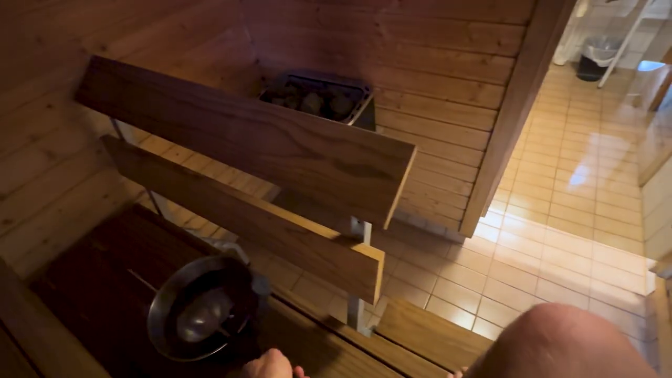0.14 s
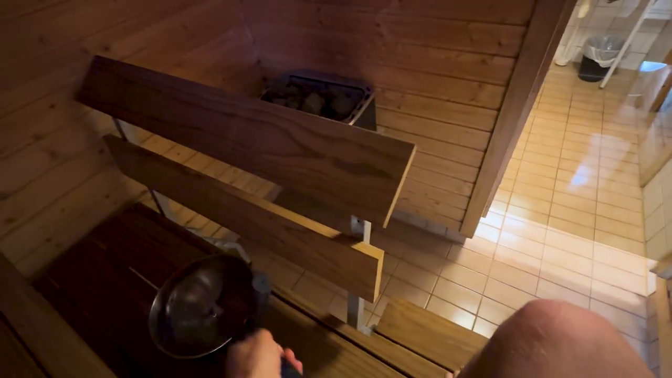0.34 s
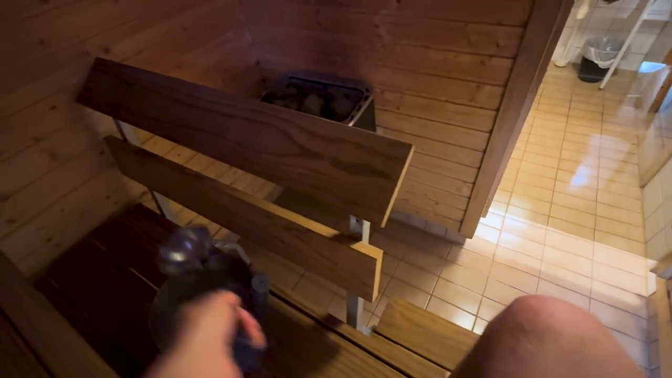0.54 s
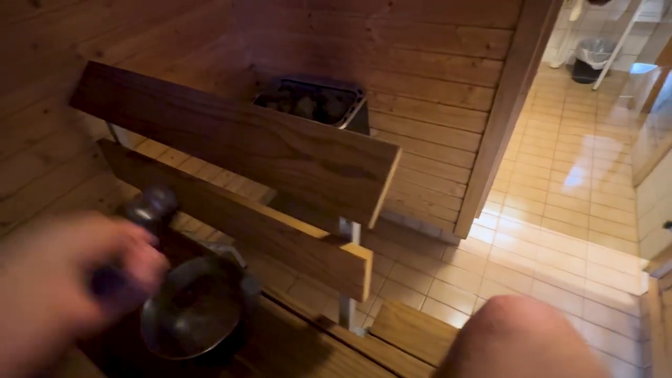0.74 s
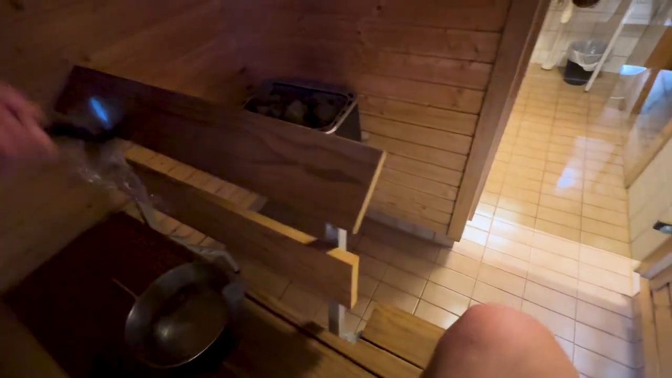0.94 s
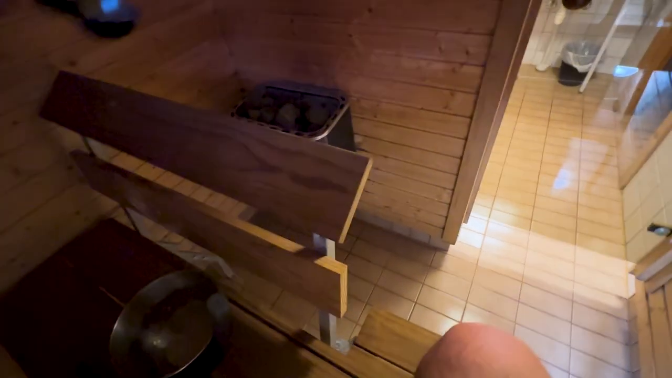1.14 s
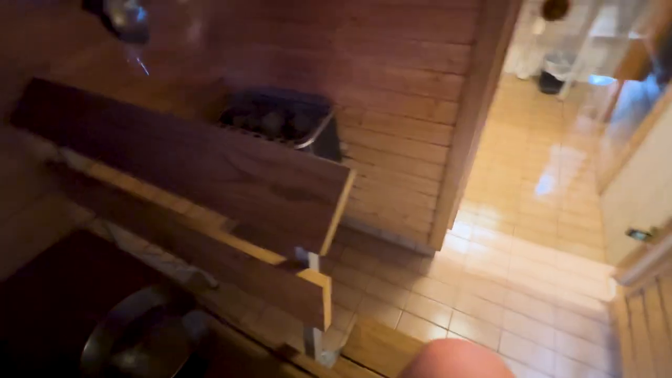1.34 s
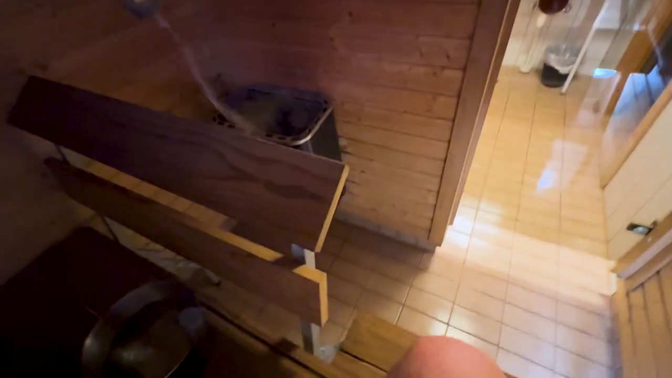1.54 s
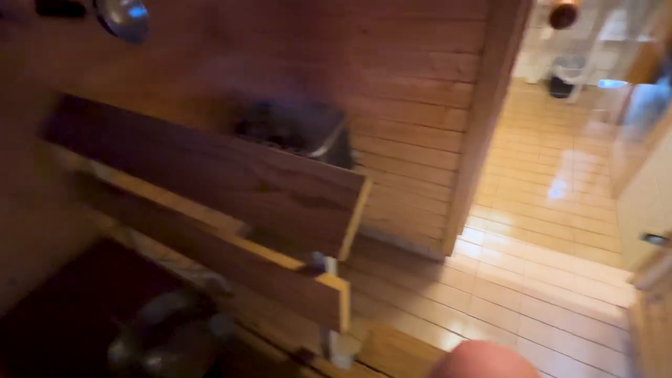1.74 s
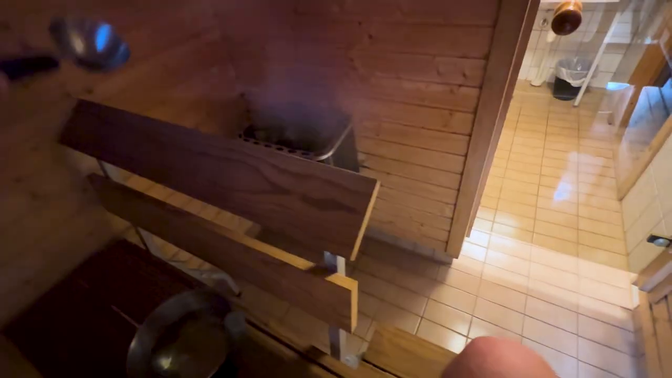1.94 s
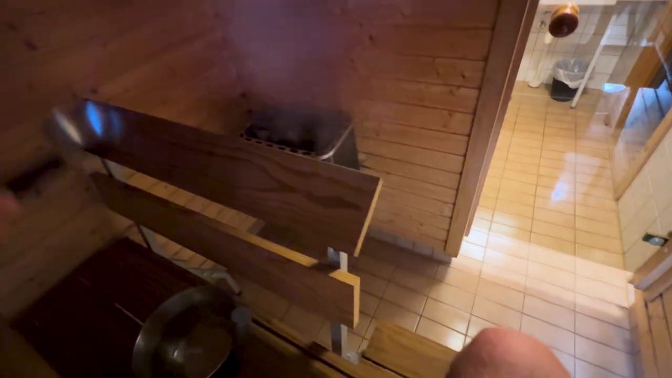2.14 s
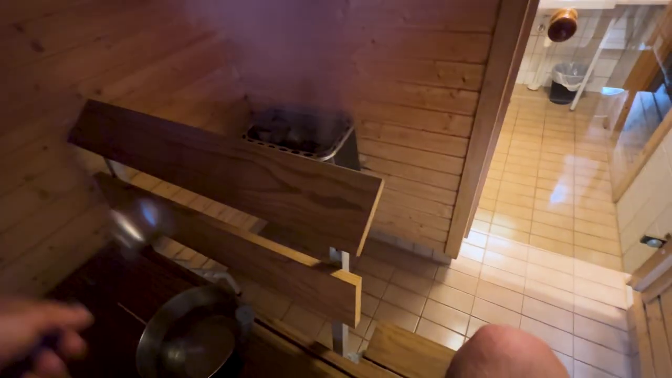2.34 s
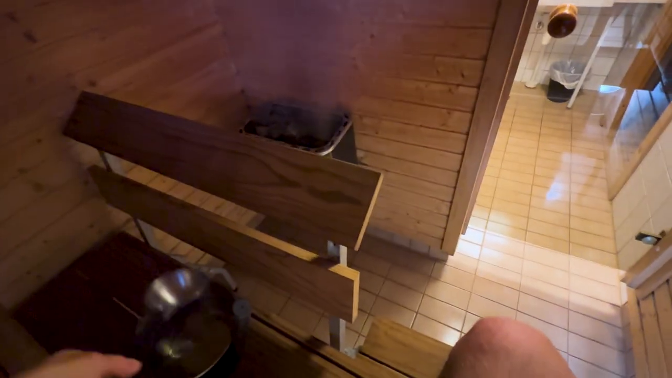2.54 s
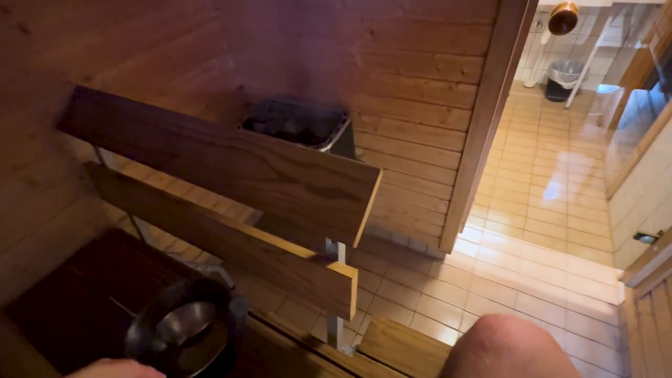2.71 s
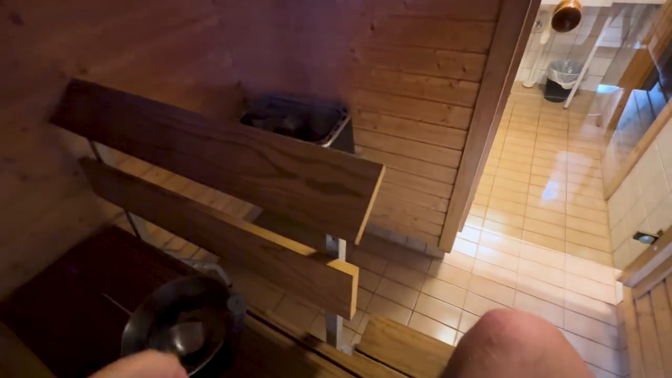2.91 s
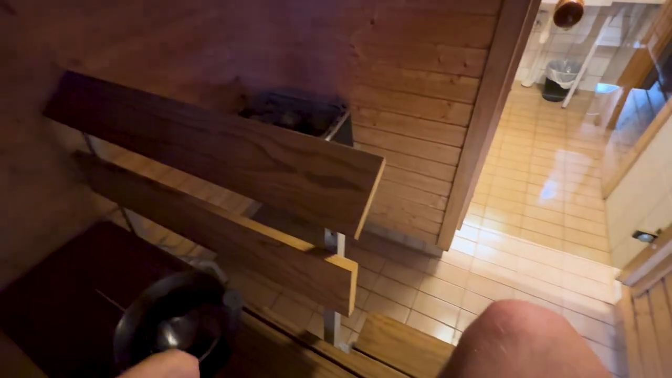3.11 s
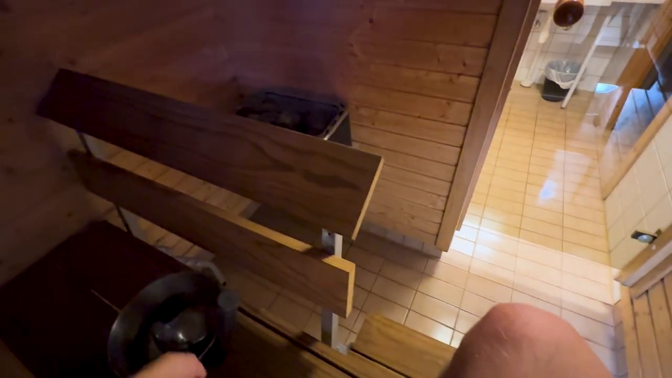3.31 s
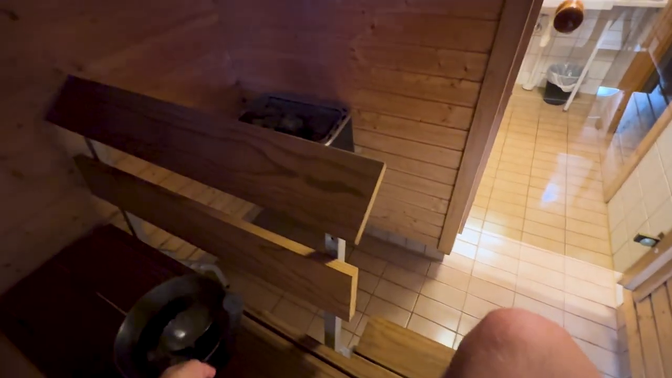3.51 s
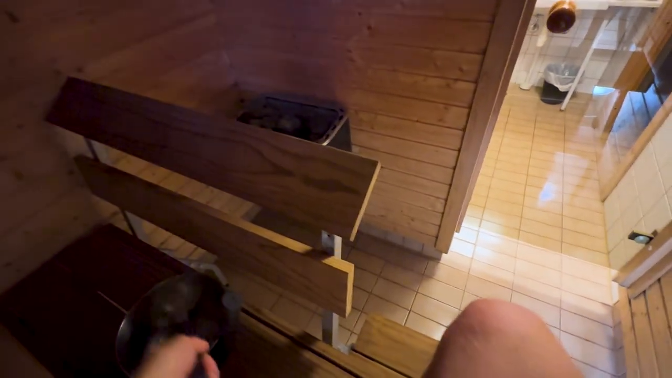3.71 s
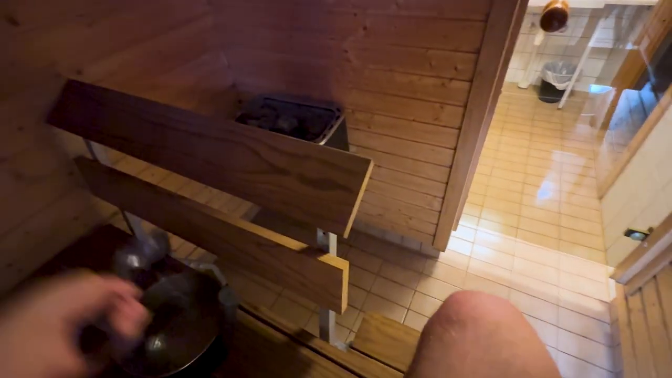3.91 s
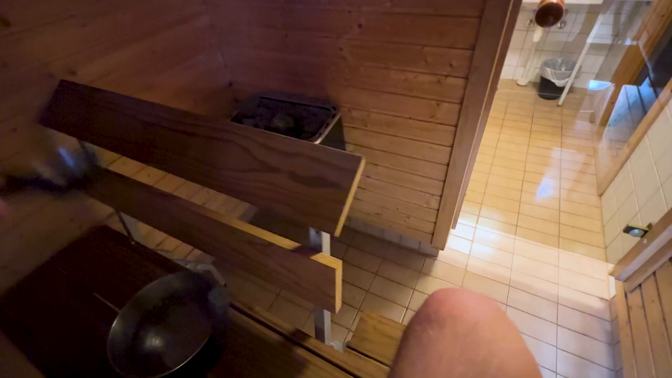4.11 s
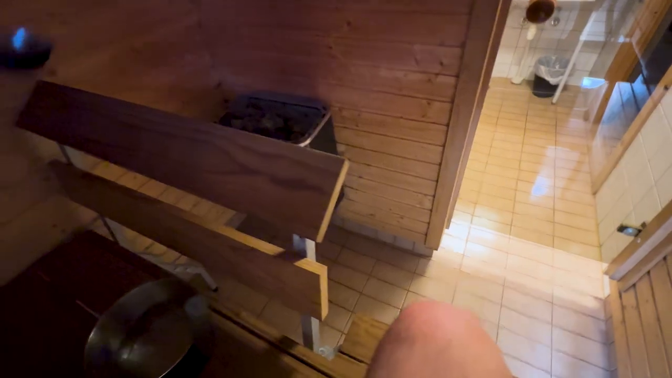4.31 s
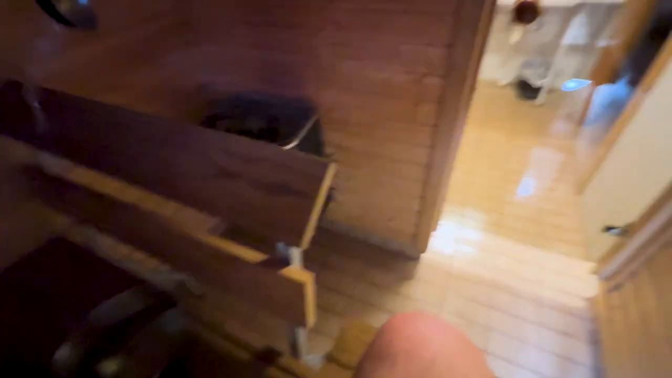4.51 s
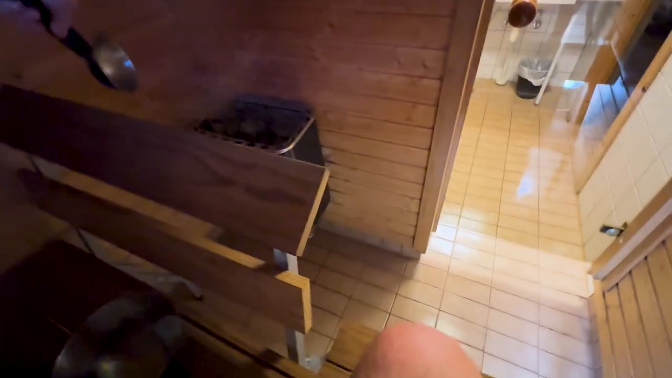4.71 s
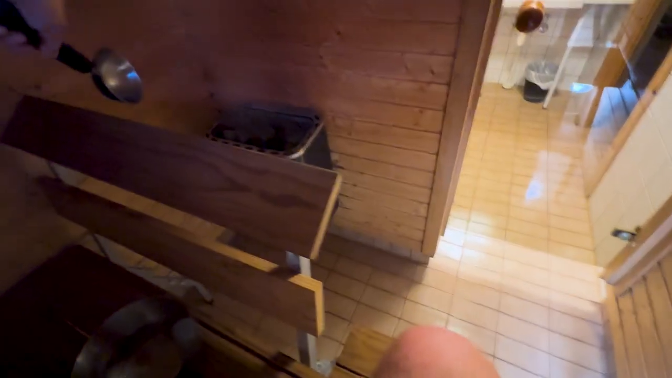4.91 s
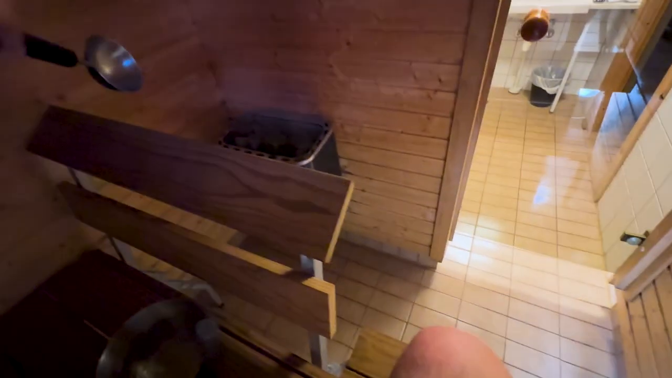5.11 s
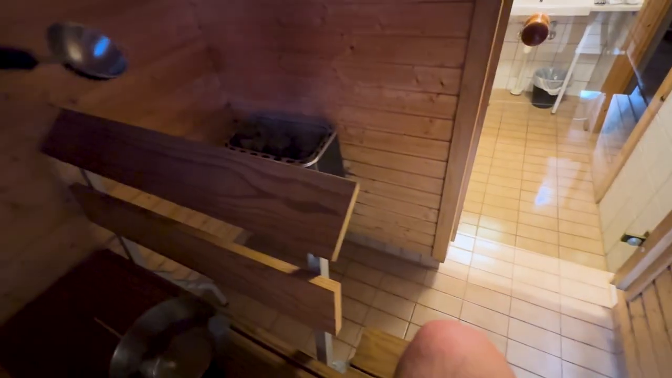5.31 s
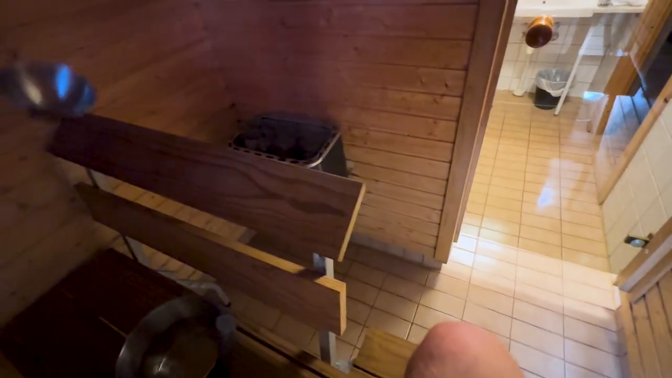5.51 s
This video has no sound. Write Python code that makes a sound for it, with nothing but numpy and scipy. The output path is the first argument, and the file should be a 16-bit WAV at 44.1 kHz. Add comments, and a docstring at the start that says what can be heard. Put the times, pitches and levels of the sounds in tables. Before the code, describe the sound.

Close stereo pickup in a quiet, small wooden room: faint pail ringing and hum, water dripping and bubbling as a ladle is lifted, then a brief hush. Water splashes on hot stones and explodes into rough, gurgling hiss, losing its bass first as it dries to fine crackling. Later another ladleful gives a fresh crisp burst of steam, still sizzling at the end.

```python
"""In a small wooden room, a dripping ladle is lifted from a steel pail and water is thrown twice on hot stones.
Each throw flashes to steam in quick puffs, then sizzles away, its bass dying first: shaped, gurgling noise.
Slaps of water are short noise bursts; drops plop as rising tones with tiny clicks where they strike.
Water trickles off the ladle as patchy noise and chirps; the pail rings in a few steady tones.
A faint mains hum and soft air noise lie under it all, and random echoes make the room."""
import sys
import numpy as np
from scipy import signal
from scipy.fft import rfft, irfft
from scipy.io import wavfile
from scipy.ndimage import uniform_filter1d

SR = 44100
rng = np.random.default_rng(int(sys.argv[2]) if len(sys.argv) > 2 else 0)


def unload_audio(sound):
    """Save the sound as a 16-bit wav file, at the path given as the first command line argument."""
    columns = np.transpose(np.atleast_2d(sound))
    # keep every value between -1 and 1, then stretch to whole-number steps
    steps = np.round(np.clip(columns, -1, 1) * 32767)
    wavfile.write(sys.argv[1], SR, steps.astype(np.int16))


N = 244755  # length in samples
# the pitches and moments at which changing noise is drawn
HZ, TIMES = np.fft.rfftfreq(512, 1 / SR), np.arange(N // 128 + 5) * 128 / SR


# colour of the sizzle: (frequency [Hz], level [dB per Hz])
SIZZLE_COLOUR = [(260, -13), (450, -9), (606, -4.5), (735, 0.5), (1030, -5), (1250, -0.5), (4850, -3),
                 (5150, -1), (5800, -5), (7470, -5.5), (8930, -3.5), (10900, -7.5), (12000, -12),
                 (15700, -11.5)]
# colour of the deep rumble: (frequency [Hz], level [dB per Hz])
RUMBLE_COLOUR = [(25, -27), (45, -4), (100, 0), (150, -24.5), (220, 3.5), (275, -16), (330, 3.5),
                 (400, -9.5), (520, -1.5), (700, -40)]


def steam():
    """Countless tiny vapour bursts: a sizzle whose lower parts, roar and rumble, need more water than the top."""
    sizzle_db, roar_db, rumble_db = boil(TIMES)
    low = 1 / (1 + (HZ[:, None] / 2300) ** 4)  # share that follows roar or rumble
    lowest = 1 / (1 + (HZ[:, None] / 560) ** 6)  # share that follows rumble
    tilt_db = (low - lowest) * roar_db + lowest * rumble_db
    patchy_db = 1.0 * patches(8, 8)
    hiss_gain = shape(SIZZLE_COLOUR, HZ)[:, None] * amp(sizzle_db + tilt_db + patchy_db)
    hiss = noise(hiss_gain, size=512)

    t = np.arange(N) / SR
    sizzle_db, rumble_db = np.interp(t, TIMES, sizzle_db), np.interp(t, TIMES, rumble_db)
    rumble_gain = shape(RUMBLE_COLOUR, np.fft.rfftfreq(4096, 1 / SR))[:, None]
    deep = evened(noise(rumble_gain, size=4096))

    # a steady dense crackle of tiny spits from droplets dancing on the stone, as loud as the sizzle allows
    tick = np.diff(signal.windows.hann(11), 2)
    spits = evened(signal.oaconvolve(sparse(540, 4.0, count=2), tick[None])[:, :N])
    top = gurgling(hiss) + amp(sizzle_db - 6) * spits
    surge = uniform_filter1d(rng.standard_normal(N), size=5000)
    surge_db = 2.6 * evened(uniform_filter1d(surge, size=5000))
    return top, amp(sizzle_db + rumble_db + surge_db - 10.0) * gurgling(deep)


# ladlefuls landing on the stones: (time of full boil [s], rise [dB/s], sizzle level [dB],
# first flash above sizzle [dB], roar against sizzle [dB], rumble against sizzle [dB])
THROWS = [(1.575, 456.5, -28, 6.5, 2, -2), (4.792, 726, -27.5, 3, 0.5, -10.5)]
# the rumble dips briefly before the second throw, then comes back stronger: (time [s], level [dB])
RUMBLE_LULL = [(4.27, -0.5), (4.47, -11), (4.54, 5.5)]
FLASH_S, DRYING_DB_PER_S = 0.18, 6.5  # the flash sinks away, the stones dry
ROAR_LAG_DB, ROAR_LAG_S = 7, 0.032  # the roar sets in a moment after the sizzle
ROAR_LOSS_DB, ROAR_S, RUMBLE_LOSS_DB_PER_S = 9, 1.84, 5.5  # the lower parts thin out sooner


def boil(t):
    """Level of the sizzle, and of roar and rumble against it, in dB; the throws add up in power."""
    s, rise_db_per_s, sizzle_db, flash_db, roar_db, rumble_db = np.transpose(THROWS)[:, :, None]
    age = np.maximum(t - s, 0)
    early = np.maximum(s - t, 0)
    level = sizzle_db + flash_db * np.exp(-age / FLASH_S)
    level = level - DRYING_DB_PER_S * age - rise_db_per_s * early
    roar = level + roar_db - ROAR_LAG_DB * np.exp(-age / ROAR_LAG_S)
    roar = roar - ROAR_LOSS_DB * (1 - np.exp(-age / ROAR_S))
    rumble = level + rumble_db - RUMBLE_LOSS_DB_PER_S * age + columns(RUMBLE_LULL, t)[0]
    level, roar, rumble = (10 * np.log10((amp(v) ** 2).sum(0) + 1e-30) for v in (level, roar, rumble))
    return level, roar - level, rumble - level


# resonances of the stove and room corner: (frequency [Hz], width [Hz], boost [dB])
STOVE = [(81, 20, 5), (245, 30, 4), (325, 26, 9), (440, 16, 4), (566, 14, 6), (608, 26, 10), (680, 20, 4),
         (770, 90, -7), (920, 30, 3), (1049, 18, 10), (1086, 16, 7), (1175, 20, 4), (1310, 20, 3),
         (1460, 40, 4), (1640, 40, 7), (1780, 30, 5)]
GURGLE_DB = 2.4  # how far each hollow between the stones swells and fades


def gurgling(x):
    """The stove's resonances come and go, each in its own time, as water fills and leaves the hollows."""
    resonance = signal.stft(coloured(x, STOVE) - x, nperseg=2048)[2]
    swell = patches(4, 5, size=resonance.shape[1:])
    swollen = resonance * amp(GURGLE_DB * (swell - .5))
    return x + signal.istft(swollen, nperseg=2048)[1][:, :N]


# water slapping water or stone, a burst of spray or steam each:
# (time [s], level [dB], centre [Hz], width [Hz], time to fall 60 dB [s])
SLAPS = [(0.191, -64, 8050, 9000, 0.96), (0.246, -58, 6000, 9000, .088), (0.354, -44.5, 5240, 4070, 0.18),
         (0.374, -36, 2800, 1100, 0.13), (.462, -50, 10000, 12000, .2), (0.577, -41.5, 8900, 6030, 0.2),
         (0.751, -51.5, 2130, 1200, 0.31), (0.756, -57, 110, 120, 0.67), (.996, -65, 10950, 9000, 0.48),
         (1.12, -60, 9250, 9000, 0.21), (1.14, -55, 600, 500, 0.16), (1.215, -57, 1120, 900, 0.2),
         (1.356, -53, 3400, 400, 0.2), (1.372, -42, 10000, 9000, 0.16), (1.39, -54, 610, 284, 0.26),
         (1.404, -29.5, 580, 345, 0.19), (1.413, -21, 8400, 14400, 0.42), (1.54, -27, 1100, 2400, 0.17),
         (1.444, -26.5, 2900, 700, 0.1), (1.522, -28.5, 6000, 7000, 0.44), (1.56, -29, 70, 60, 0.97),
         (1.585, -10.5, 1500, 2560, 0.085), (1.621, -5.5, 2000, 3130, 0.037),
         (1.646, -19.5, 1110, 1000, 0.2), (1.7, -13.5, 1380, 260, 0.16), (1.732, -27, 1410, 500, 0.051),
         (1.703, -9.5, 2700, 2500, 0.091), (1.806, -16.5, 5000, 5500, 0.47), (2.6, -30.5, 321, 50, 0.15),
         (2.88, -24, 1160, 597, 0.072), (3.431, -41, 590, 260, 0.28), (4.531, -37, 5000, 9000, 0.43),
         (4.527, -48, 213, 59, 0.34), (4.548, -33, 3800, 2000, 0.1), (4.551, -32.5, 7900, 12000, 0.15),
         (4.781, -27, 70, 70, 0.72), (4.766, -22.5, 4400, 9100, 0.13), (4.83, -26, 3050, 3080, 0.85),
         (4.908, -13.5, 1300, 1190, 0.061), (5.02, -19, 5740, 5000, 0.21)]


def slaps():
    """Each slap of water: a band of noise that rises within milliseconds, slower when low, and dies."""
    out, t = np.zeros((2, N)), np.arange(SR // 2) / SR
    hz = np.fft.rfftfreq(len(t), 1 / SR)
    for s, db, centre_hz, width_hz, t60 in SLAPS:
        bass_cut = (hz / (hz + 0.048 * centre_hz)) ** 3
        band = bass_cut / (1 + (2 * (hz - centre_hz) / width_hz) ** 2)
        burst = evened(irfft(pair(hz, count=1)[..., 0] * band, len(t)))
        rise = 1 - np.exp(-t / (0.00089 + 7.3 / centre_hz))
        add(out, s, burst * rise * amp(db - 60 * t / t60), pan_db=-1.5)
    return coloured(out, STOVE)


# drops and bubbles, in the pail and then between the stones:
# (time [s], level [dB], starting pitch [Hz], time to fall 60 dB [s], left over right [dB])
DROPS = [(.217, -31, 1098, 0.059, 9), (.244, -41, 852, 0.059, 15), (.262, -46, 3950, 0.032, -2),
         (.262, -41, 824, 0.1, 4), (.296, -53, 3250, .08, 9), (.39, -50, 510, .05, 8),
         (.416, -46, 600, 0.05, 10), (.451, -45, 3470, .074, 0), (.460, -26, 883, 0.047, 11.5),
         (.465, -42, 3040, 0.046, 4), (.47, -57.5, 388.7, 0.83, 2), (.481, -25.5, 871, 0.037, -7),
         (.499, -32, 837, 0.028, 9), (.526, -45, 930, 0.037, 0), (.542, -38, 840, 0.032, 2),
         (.575, -52, 834, 0.07, 5), (.612, -43, 3680, 0.082, -1), (.646, -55, 3710, 0.058, 1),
         (.753, -49, 2060, 0.076, -13), (.769, -42.5, 1990, 0.047, 13), (1.124, -58.5, 878, 0.31, 5),
         (1.409, -32.5, 1496, 0.12, 5), (1.417, -30.5, 1118, 0.072, 3), (1.439, -28, 615, 0.033, -2),
         (1.475, -31, 604, 0.042, -8), (1.512, -48, 590, 0.05, -2)]
GLIDE, GLIDE_S = 0.016, 0.035  # share by which a bubble's pitch rises, and how soon
HOLD = 1.26  # above 1 a bubble holds its tone at first, then breaks off
ROUGH_PER_KHZ, ROUGH_S = 0.68, 0.035  # wander [radians per kHz of pitch], and how soon it grows


def drops():
    """A drop traps a bubble that rings unevenly, its pitch rising as it nears the surface."""
    out, t = np.zeros((2, N)), np.arange(SR // 2) / SR
    glide = np.cumsum(1 + GLIDE * (1 - np.exp(-t / GLIDE_S))) / SR
    breakup = 1.2 - np.exp(-t / ROUGH_S)  # grows from 0.2 to 1.2 of the wander
    for s, db, hz, t60, pan_db in DROPS:
        wobble = ROUGH_PER_KHZ * hz / 1000 * breakup * drift(len(t), 120)
        flutter_db = 3.5 * np.minimum(t / .05, 1) * drift(len(t), 300)
        ring = np.sin(2 * np.pi * hz * glide + wobble) * amp(flutter_db)
        rise = 1 - np.exp(-t / 0.0035)
        add(out, s, ring * rise * amp(db - 60 * (t / t60) ** HOLD), pan_db)
    return out


# the instant a drop strikes the water: (time [s], level [dB], centre [Hz])
TICKS = [(.2433, -44, 4000), (0.355, -36, 4180), (.3574, -44, 11000), (0.3866, -31, 10400),
         (.5821, -40, 10000)]
TICK_S = 0.00025  # fade on either side of the instant


def ticks():
    """A drop striking water: a very short click, so its pitch is spread wide."""
    out, t = np.zeros((2, N)), np.arange(-100, 200) / SR
    for s, db, hz in TICKS:
        click = np.exp(-abs(t) / TICK_S) * np.sin(2 * np.pi * hz * t)
        add(out, s + t[0], amp(db) * click, pan_db=-3)
    return out


# water running off the ladle: (time [s], level [dB])
TRICKLE = [(0, -53), (.13, -83), (.24, -67.5), (.38, -65.5), (.5, -57), (.7, -75), (1.0, -83),
           (1.11, -81.5), (1.2, -71.5), (1.34, -85), (1.42, -50.5)]
# colour of the splashing: (frequency [Hz], level [dB per Hz])
SPLASH_COLOUR = [(180, -68.5), (300, -25.5), (390, -9), (695, -10), (838, -12), (1530, -6), (2860, -10),
                 (6000, -18.5), (9000, -53)]
# fine spray against the splashing, before and after the ladle is lifted
LIFT_S, FIZZ_SUNK_DB, FIZZ_LIFTED_DB = .36, -12.5, 2.5


def trickle():
    """Patchy splashing with a fizz of fine spray on top, and small droplets that chirp."""
    level_db = columns(TRICKLE, TIMES)[0]
    fizz_db = np.where(TIMES < LIFT_S, FIZZ_SUNK_DB, FIZZ_LIFTED_DB)
    fizz_colour = shape([(4500, 7.0), (6500, 10.0), (10000, 6.5), (12000, -3), (15500, -4)], HZ)
    fizz = fizz_colour[:, None] * amp(fizz_db)
    patchy_db = 3 * patches(6, 6) + 1.5 * patches(90, 1)
    field = np.hypot(shape(SPLASH_COLOUR, HZ)[:, None], fizz) * amp(level_db + patchy_db)
    end_s = TRICKLE[-1][0]
    splashing = noise(field * (TIMES < end_s), size=512)

    # ten sizes of droplet, each a short upward chirp
    u, pitch = np.arange(1000) / SR, np.geomspace(2000, 5000, num=10)[:, None]
    chirps = np.sin(2 * np.pi * pitch * u * (1 + 2 * u)) * u * np.exp(-u * pitch / 10)
    droplets = evened(signal.oaconvolve(sparse(30, 2.8, count=10), chirps, axes=1).sum(0)[:N])
    t = np.arange(N) / SR
    return splashing + droplets * amp(columns(TRICKLE, t)[0] - 8) * (t < end_s)


# the pail, still ringing from a knock: (frequency [Hz], level [dB], time to fall 60 dB [s])
PAIL_TONES = [(81.4, -49.5, 0.83), (257, -52.5, 1), (610, -47.5, 0.39), (663, -50, 0.44), (1473, -50, 0.43),
              (1880, -56, 0.4), (3650, -51, 0.32)]


def pail():
    """The steel wall rings in fading tones, each a little unsteady with the water moving inside."""
    t, out = np.arange(N) / SR, np.zeros(N)
    for hz, db, t60 in PAIL_TONES:
        sway = 0.83 * drift(N, 500)
        out += amp(db - 60 * t / t60) * np.sin(2 * np.pi * (hz * t + rng.random()) + sway)
    return out


# mains hum: (frequency [Hz], average level [dB rms])
HUM = [(100, -79.5), (202, -82.5)]
# colour of the air noise: (frequency [Hz], level [dB per Hz])
AIR_COLOUR = [(18, -40), (30, 10), (206, 16), (421, 5), (540, -20), (4000, -18.5), (5200, -42),
              (8800, -120)]
AIR_DB = -81  # average level


def quiet():
    """Air of the house as soft noise, and a mains hum of two tones whose loudness wavers."""
    t = np.arange(N) / SR
    waver_db = 0.93 * drift((len(HUM), N), 4000)
    hum = sum(np.sqrt(2) * amp(db + w) * np.sin(2 * np.pi * hz * t) for (hz, db), w in zip(HUM, waver_db))
    air_gain = shape(AIR_COLOUR, np.fft.rfftfreq(2048, 1 / SR))[:, None]
    return hum + amp(AIR_DB) * evened(noise(air_gain, size=2048))


# how fast the walls swallow echoes: (frequency [Hz], time to fall 60 dB [s])
WALLS = [(100, 0.13), (1000, 0.35), (4000, 0.41), (12000, 0.085)]


def room(x):
    """A tail of random echoes, each band dying at its own speed, alike on both sides in the bass."""
    hz, t = np.fft.rfftfreq(256, 1 / SR), np.arange(340) * 64 / SR
    decay = amp(-60 * t / read(WALLS, hz)[:, None]) * (t > .004)
    tail = signal.istft(pair(hz, count=len(t)) * decay, nperseg=256, noverlap=192)[1]
    return signal.fftconvolve(x, tail / np.linalg.norm(tail) * np.sqrt(2), axes=1)[:, :N]


# how alike the two sides are: (frequency [Hz], likeness [0 to 1])
LIKENESS = [(90, .995), (300, .85), (560, .6), (780, .1), (1040, .75), (1450, .2), (9200, .1), (10300, .4),
            (11000, 1), (13000, 1), (13700, .8), (14000, .75)]
# turn of the wave between the sides: (frequency [Hz], phase [radians])
SIDE_PHASE = [(430, 0), (620, 1.6), (950, 0), (1650, -2.8), (10500, 0), (13400, 0), (15700, 2.3)]
# loudness between the sides: (frequency [Hz], left over right [dB])
BALANCE = [(200, 0), (550, 3), (1050, 0), (1300, 3), (2500, -2), (4200, 1), (4900, 6), (7800, 6),
           (9700, -8.5), (10900, 0)]


def pair(hz, count):
    """Random spectra for two sides that share part of their waves: sides x bins x count."""
    a, b, c, d = rng.standard_normal((count, len(hz), 4)).T
    same = np.clip(read(LIKENESS, hz), -1, 1)[:, None]
    turn = np.exp(1j * read(SIDE_PHASE, hz))[:, None]
    left = a + 1j * b
    right = same * turn * left + np.sqrt(1 - same ** 2) * (c + 1j * d)
    balance = amp(np.multiply.outer([.5, -.5], read(BALANCE, hz)))
    return np.array([left, right]) * balance[:, :, None]


def noise(gain, size):
    """Two-sided noise; gain is bins x frames, or one column for all frames."""
    z = pair(np.fft.rfftfreq(size, 1 / SR), count=4 * N // size + 5) * gain
    return signal.istft(z, nperseg=size, noverlap=3 * size // 4)[1][:, :N] * 3  # near unit power


def patches(bins, frames, size=(len(HZ), len(TIMES))):
    """Random patches over frequency and time, rms 1."""
    field = uniform_filter1d(rng.standard_normal(size), size=bins, axis=0)
    return evened(uniform_filter1d(field, size=frames, axis=1))


def drift(shape, size):
    """Slow random wandering, rms 1, smoothed over size samples."""
    return evened(uniform_filter1d(rng.standard_normal(shape), size=size))


def sparse(per_s, spread_db, count):
    """Trains of clicks at random times, a few of them large."""
    heights = amp(spread_db * np.minimum(rng.exponential(1, (count, N)), 5))
    return heights * (rng.random((count, N)) < per_s / SR)


def coloured(x, modes):
    """Lifts or cuts each resonance; phase follows from gain so that nothing rings before its cause."""
    hz = abs(np.fft.fftfreq(N, 1 / SR))
    gain_db = sum(db / (1 + (2 * (hz - f) / width) ** 2) for f, width, db in modes)
    log_response = signal.hilbert(np.log(amp(gain_db))).conj()
    return irfft(rfft(x) * np.exp(log_response)[:N // 2 + 1], N)


def add(mix, s, sound, pan_db):
    """Lays a sound into the mix at time s; positive pan_db leans left."""
    part = mix[:, round(s * SR):][:, :sound.shape[-1]]
    part += amp([[pan_db / 2], [-pan_db / 2]]) * sound[..., :part.shape[1]]


def amp(db):
    """Decibels to a plain factor."""
    return 10 ** (np.asarray(db) / 20)


def evened(x):
    """Scales to rms 1."""
    return x / np.sqrt(np.mean(x ** 2) + 1e-20)


def read(points, hz):
    """Reads a table between its frequencies, on a logarithmic scale."""
    f, value = np.transpose(points)
    return np.interp(np.log(hz + 1), np.log(f + 1), value)


def shape(points, hz):
    """Gain per bin of a spectrum, total power 1."""
    gain = amp(read(points, hz))
    return gain / np.linalg.norm(gain)


def columns(rows, t):
    """Reads every column of a table between its times."""
    s, *values = np.transpose(rows)
    return [np.interp(t, s, v) for v in values]


def scene():
    """Water and steam sound directly and through the room; rumble, pail and background have no echo."""
    water = slaps() + drops() + ticks() + trickle()
    hiss, rumble = steam()
    echoes = room(amp(-6.5) * water + amp(-13.5) * hiss)
    return water + hiss + rumble + echoes + pail() + quiet()


# narrow dips in the treble: (frequency [Hz], width [Hz], change [dB])
TREBLE_DIPS = [(5194, 230, -9.5), (7470, 270, -9), (9700, 130, -6.5)]
EDGE_HZ = 15760  # top of the band


def record(dry):
    """The deepest bass is rolled off, three narrow dips sit in the treble, then the band limit."""
    dry = signal.sosfilt(signal.butter(2, 35, "high", fs=SR, output="sos"), dry)
    edge = signal.firwin(1023, EDGE_HZ, window=("kaiser", 9), fs=SR)
    return signal.oaconvolve(coloured(dry, TREBLE_DIPS), edge[None], "same")


dry = scene()
out = record(dry)
unload_audio(out)
```